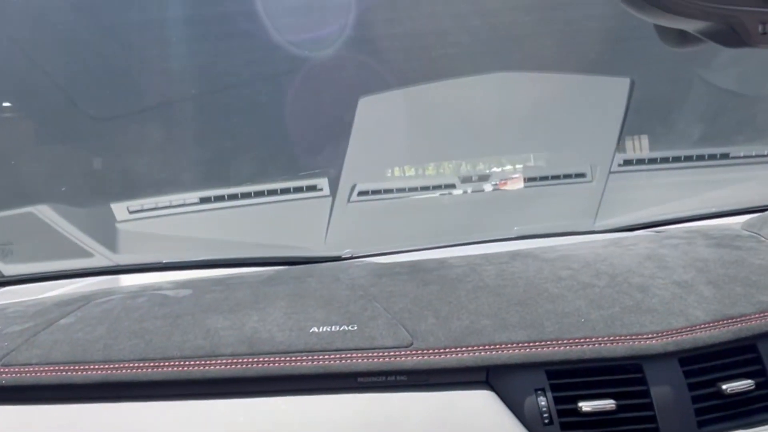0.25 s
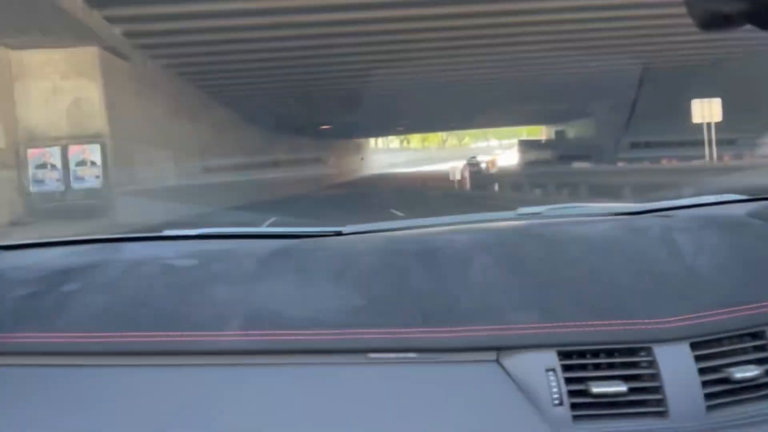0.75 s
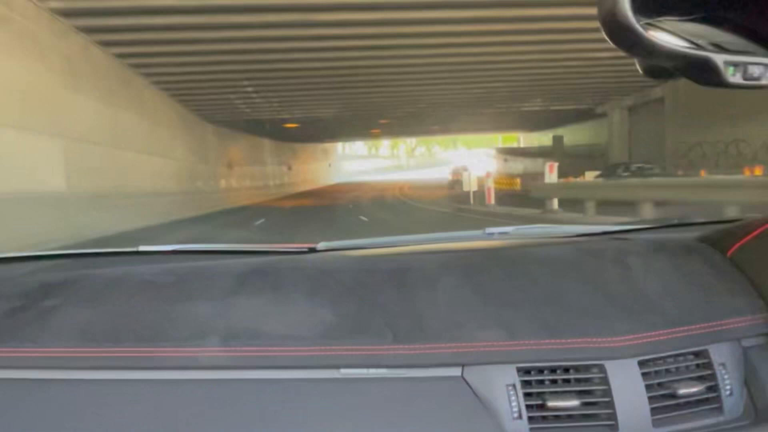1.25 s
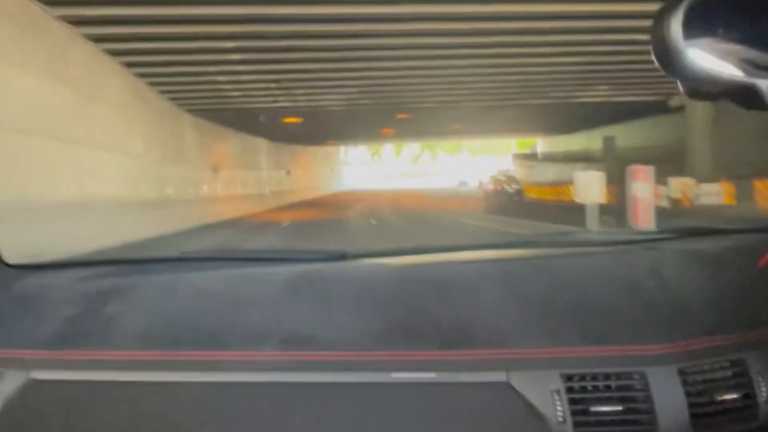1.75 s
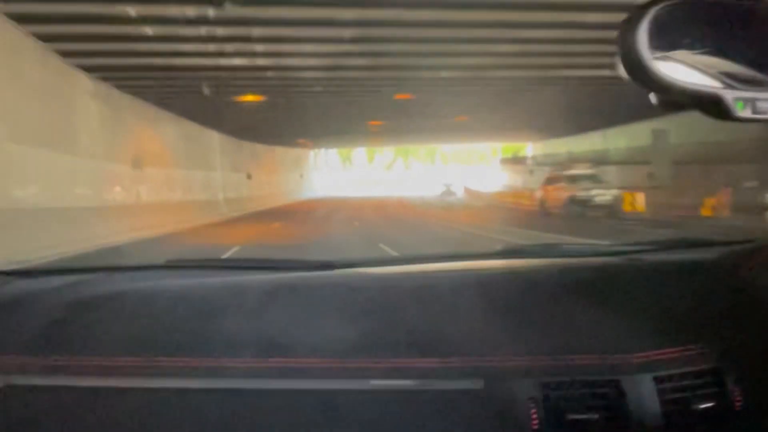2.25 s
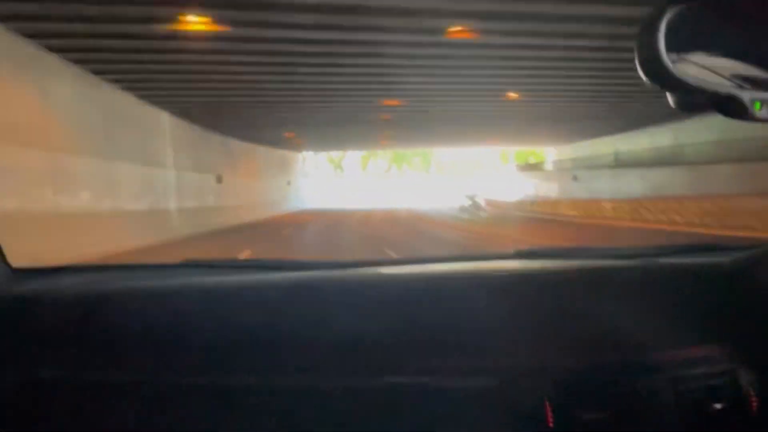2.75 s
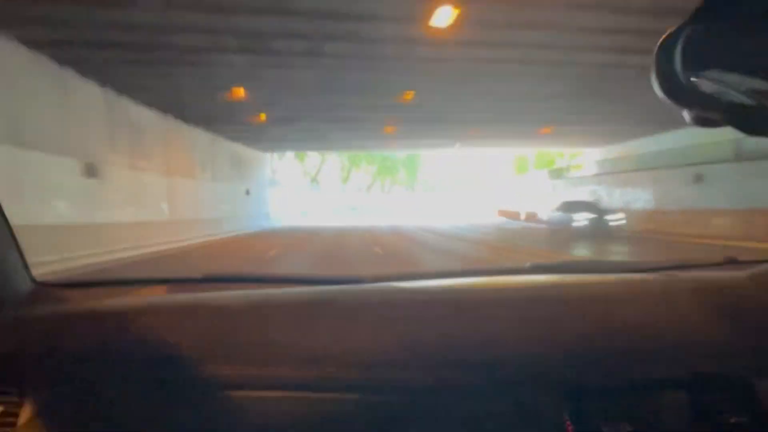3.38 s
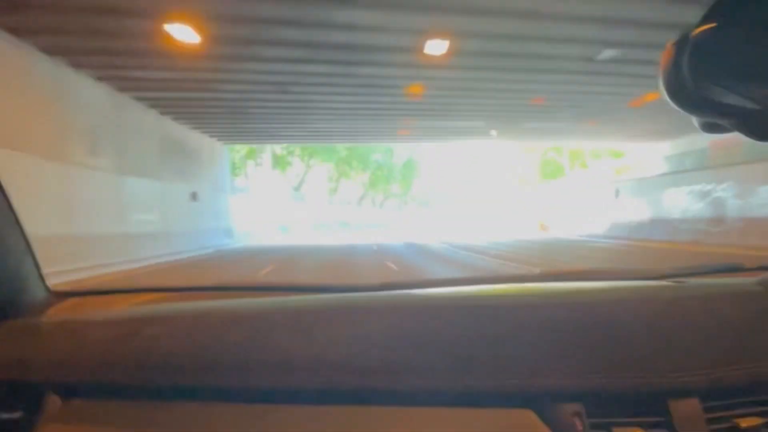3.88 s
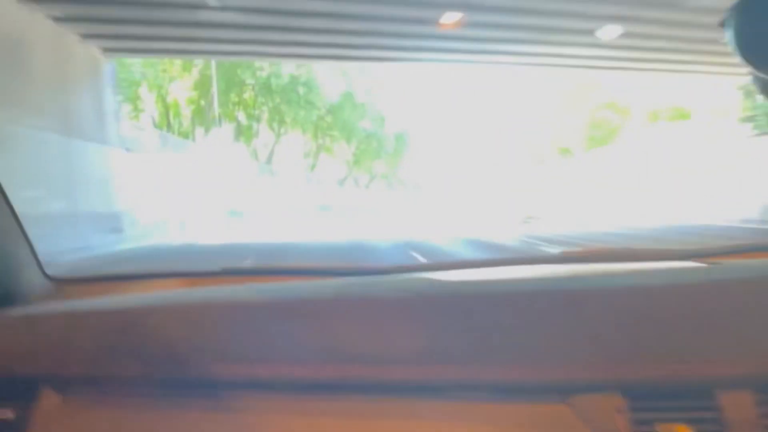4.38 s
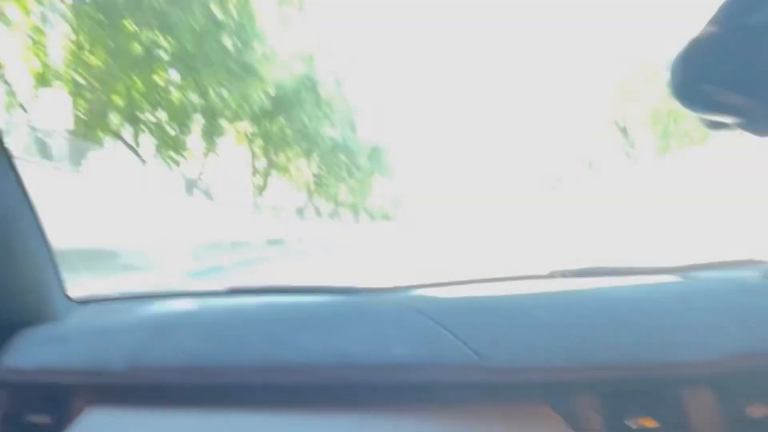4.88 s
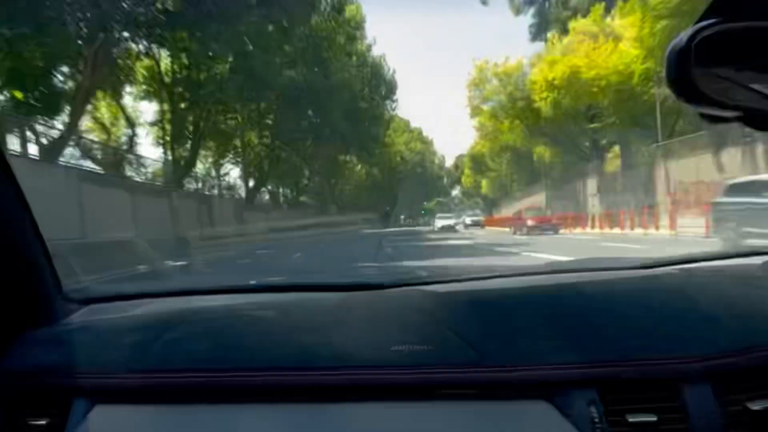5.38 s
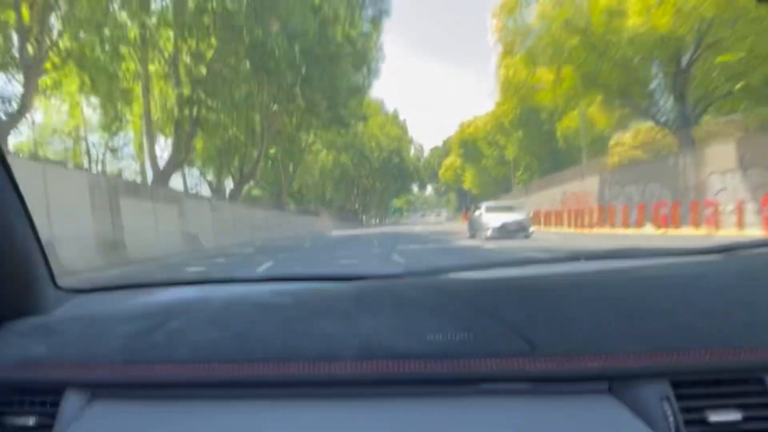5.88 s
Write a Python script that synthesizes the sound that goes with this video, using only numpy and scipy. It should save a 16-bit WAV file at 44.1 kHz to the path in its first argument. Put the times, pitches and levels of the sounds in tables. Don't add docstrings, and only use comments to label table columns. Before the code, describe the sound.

A phone inside a sports car cabin hears a low, steady twelve-cylinder growl with road rumble, body drone and wind hiss for the first 0.6 seconds. At about 0.7 a downshift lands as a heavy low thump with duller cracks and a brief, very high clutch squeak; the revs jump sharply by 0.9, and the cabin booms. A fainter squeak comes near 1.1. From 1 to 4.3 seconds the engine pulls hard, its note climbing from a throaty growl to a dense wail about twice as high, roughened by lower, beating echoes from the tunnel walls and gassy roar, with small bumps. Around 4.4 an upshift briefly cuts the power and drops the pitch; the note then holds almost level. At about 5.4 the driver lifts off: soft low thuds, the firing note collapses, and a quieter, wavering hum remains over rumble and hiss until 6.1.

```python
import sys
import numpy as np
from scipy import signal
from scipy.fft import rfft, irfft, next_fast_len
from scipy.io import wavfile
from scipy.ndimage import uniform_filter1d, map_coordinates

SR = 44100
rng = np.random.default_rng(int(sys.argv[2]) if len(sys.argv) > 2 else 0)


def persist_wave(psi):
    counts = np.round(np.clip(psi, -1, 1) * 32767).astype(np.int16)
    wavfile.write(sys.argv[1], SR, np.atleast_2d(counts).T)


def voltage_ratio(decibels):
    exponent = np.asarray(decibels, float) / 20
    return 10 ** exponent


N = 270200
T = np.arange(N) / SR

# time_s, crankshaft_turns_hz
REVS = [(0, 35.12), (.62, 34.83), (.9, 58.17), (1.0, 59.8), (1.3, 63.92), (1.5, 65.57), (1.9, 77.19),
        (2.2, 83.23), (2.35, 89.2), (2.9, 105), (3.4, 116.9), (3.6, 121.1), (4.05, 132.8), (4.37, 133.8),
        (4.58, 104.1), (5.2, 106.4), (5.42, 103.2), (6.13, 100.8)]


def unit(x):
    return x / np.sqrt(np.mean(np.abs(x) ** 2) + 1e-20)


def along(points, hz):
    f, v = np.transpose(points)
    return np.interp(np.log(hz + 1), np.log(f + 1), v)


def curves(rows, t=T):
    s, *cols = np.transpose(rows)
    return [np.interp(t, s, c) for c in cols]


def wobble(rate, t=T):
    return map_coordinates(rng.standard_normal(800), [t * rate])


def filtered(x, response):
    m = next_fast_len(N + SR // 2)
    return irfft(rfft(x, m) * response(np.fft.rfftfreq(m, 1 / SR)), m)[..., :N]


def rush(spectrum, patchy_db, size=10):
    z = signal.stft(rng.standard_normal((2, N)), nperseg=512)[2]
    field = uniform_filter1d(rng.standard_normal(z.shape[1:]), size=6, axis=0)
    field = uniform_filter1d(field, size=size, axis=1)
    pair = signal.istft(z * voltage_ratio(patchy_db * unit(field)), nperseg=512)[1][:, :N]
    return unit(filtered(pair, lambda hz: voltage_ratio(along(spectrum, hz))))


def peaks(rows, hz, floor_db):
    power = sum(voltage_ratio(db) ** 2 / (1 + ((hz - c) / w) ** 6) for c, w, db in rows)
    return np.sqrt(voltage_ratio(floor_db) ** 2 + power)


def turns():
    return 2 * np.pi * np.cumsum(uniform_filter1d(curves(REVS)[0], size=3000)) / SR


def firing_db(k):
    # time_s, firing_note_db, upper_orders_lean_db_per_octave
    firing = [(0, -17.5, -2.5), (.3, -5.5, -4.5), (.62, -3, -0.5), (.9, 0, -3), (1.2, -1.5, 2.5),
              (1.5, 1, 0.5), (1.78, 2.5, -4), (2.0, 1.5, 3), (2.4, 2, -1), (2.9, 1, -1), (3.1, -1.5, -1),
              (3.5, -3.5, -2.5), (3.9, -9, 2), (4.25, -6.5, -0.5), (4.65, -10, 0.5), (4.95, -6, -0.5),
              (5.15, -6, -8.5), (6.13, -4.5, -11)]
    level_db, lean = curves(firing)
    return level_db + lean * np.log2(k / 4)


def shut_db(t):
    # start_s, length_s, drop_db
    lifts = [
        (4.415, .18, -13),
        (5.366, .9, -22.5),
    ]
    fade_s = 0.079
    return sum(db * np.clip(np.minimum(t - s, s + length - t) / fade_s + .5, 0, 1)
               for s, length, db in lifts)


def boom(angle):
    # order_that_shakes_it, pitch_hz, half_width_hz, level_db
    mounts = [(1, 59.8, 3.3, -12), (1, 61, 4.5, -26), (1, 97.4, 2.1, -29.5), (1, 114, 10.7, -32.5),
              (1, 128, 3.4, -19.5), (1.5, 52.5, 2.9, -22), (1.5, 105.4, 4.7, -27), (1.5, 119, 4.6, -33),
              (1.5, 138, 3, -30.5), (1.5, 192, 16, -32.5), (2, 72, 5, -33), (2, 87, 9.6, -15.5),
              (2, 120, 2.5, -30), (2, 146.3, 10.4, -29)]
    mount_floor_db = {1: -51.5, 1.5: -54, 2: -64}
    hz = np.gradient(angle) * SR / (2 * np.pi)
    lead_s, cut = 0.13, 1.4
    effort_db = 0.96 * firing_db(4) + cut * shut_db(T + lead_s)
    tones = np.zeros(N)
    for k, floor_db in mount_floor_db.items():
        panels = [row[1:] for row in mounts if row[0] == k]
        gain = peaks(panels, k * hz, floor_db) * voltage_ratio(effort_db + 1.5 * wobble(8))
        tones += gain * np.sin(k * angle)
    return np.array([np.sqrt(2) * tones, np.zeros(N)])


def order_in_tunnel(k, angle, wetter, count=6):
    # time_s, largest_echo_pitch_drop (0-1), echo_share_of_note (0-1, cut off just under 1)
    walls = [(0, .03, .15), (.62, .04, .2), (.75, .07, .6), (1, .08, .65), (1.6, .09, .55), (2, .1, .7),
             (2.7, .11, .7), (3, .11, .6), (4.2, .12, .65), (4.4, .13, .95), (4.65, .1, .8),
             (4.8, .09, .55), (5, .1, .45), (5.1, .12, .15), (5.36, .12, .12), (5.45, .12, .6),
             (5.6, .2, 1.4), (6.13, .2, 1.4)]
    t = T[::16]
    drop, wet = curves(walls, t)
    wet = np.clip(wet * wetter, 0, .97)
    slip = np.cumsum(drop * np.gradient(angle[::16]))
    pair = []
    for direct in (1, 0):
        behind = .2 + .8 * (np.arange(count) + rng.random(count)) / count
        depth = np.append(behind, -.22)
        echoes = 0
        for d in depth:
            fading = (wobble(12, t) + 1j * wobble(12, t)) * voltage_ratio(-4 * abs(d) - 3 * (d < 0))
            echoes = echoes + fading * np.exp(-1j * k * d * slip)
        straight = direct * np.sqrt(1 - wet) * voltage_ratio(0.47 * wobble(14, t))
        shape = straight + np.sqrt(wet) * unit(echoes)
        in_step = np.interp(T, t, shape.real) * np.cos(k * angle)
        pair.append(in_step - np.interp(T, t, shape.imag) * np.sin(k * angle))
    return np.sqrt(2) * np.array(pair)


def exhaust(angle):
    main_db = {3: -19.5, 4.5: -26.5, 6: -18, 9: -27}
    # pitch_hz, half_width_hz, level_db
    cabin = [(198.5, 9, 6), (238.5, 7.6, 4.5), (268, 11.2, 2), (315, 21, -0.5), (345, 5.6, 3),
             (378.4, 22.6, 5), (464, 36, -2.5), (548, 30, -1), (643, 40, 3), (738, 23, 0.5), (830, 33, 4.5),
             (879, 53, 1.5), (1079, 115, 4.5), (1296, 38, 4)]
    # turns_hz, level_db
    uneven = [(35, -2.5), (58, 5.5), (65, -9), (72, -1.5), (82, -0.5), (92, 2.5), (104, -7), (120, -4),
              (135, -2)]
    # order, level_db relative to order 4.5
    weak = [(4, -9), (5, -6), (5.5, -1), (7, -11)]
    # order, level_db relative to order 9
    high = [(7.5, -2), (8, -9.5), (10.5, -11.5), (12, -9), (13.5, -16), (15, -19.5), (18, -23), (21, -25)]
    hz = np.gradient(angle) * SR / (2 * np.pi)
    third, half, sixth, ninth = [voltage_ratio(db + firing_db(k) + shut_db(T)) * peaks(cabin, k * hz, -7.5)
                                 for k, db in main_db.items()]
    half = half * voltage_ratio(along(uneven, hz))
    note = third * order_in_tunnel(3, angle, wetter=.65)
    note += half * order_in_tunnel(4.5, angle, wetter=1.3)
    note += sixth * order_in_tunnel(6, angle, wetter=.95)
    note += ninth * order_in_tunnel(9, angle, wetter=.9)
    for k, db in weak:
        note += half * voltage_ratio(db) * order_in_tunnel(k, angle, wetter=1.5)
    for k, db in high:
        note += ninth * voltage_ratio(db) * order_in_tunnel(k, angle, wetter=1)
    return note


def hollowed(x):
    order, half_width_octaves, depth_db = 1.78, 0.21, -8.5
    hz, t, z = signal.stft(x, SR, nperseg=2048)
    octaves = np.log2((hz[:, None] + 1) / (order * curves(REVS, t)[0]))
    dip = voltage_ratio(depth_db * np.exp(-(octaves / half_width_octaves) ** 2))
    return signal.istft(z * dip, SR, nperseg=2048)[1][:, :N]


def roar(angle):
    # time_s, engine_effort_db, body_shaking_db
    drive = [(0, -5, 6.5), (.15, -6, 1.5), (.6, -5, 8), (.8, -2, 13), (1.2, -1.5, 14), (1.35, -1.5, 5),
             (1.8, 0, 7.5), (2.05, 2, 0.5), (2.2, -0.5, 1.5), (2.92, 0, 6), (3.0, -3.5, -4), (3.4, -3, -1),
             (4.25, -2.5, -3), (4.6, -12, 1.5), (4.9, -9, -0.5), (5.33, -9.5, 3), (5.5, -15.5, 1),
             (6.13, -14, 1.5)]
    # time_s, surge_db
    shunts = [(.72, 5.5), (.87, 12), (1.0, 6), (1.26, 8.5), (1.45, 7), (1.69, -1.5), (2.0, 7.5), (2.6, 1.5),
              (4.45, 7), (5.03, 4), (5.22, 4), (5.42, 6), (5.5, 1)]
    # level_db, share of effort, of shaking and of surges that each layer follows
    layers = [
        (-25, .05, 1, 0.65),
        (-13, 1, 0.32, 0.38),
        (-25, 1, 0.016, 0.13),
        (-42, 0.96, 0.19, 0.35),
    ]
    # pitch_hz, level_db_per_hz
    road_colour = [(11, -63), (18, -32), (35, -10), (59, 5.5), (132, -5.5), (149, -7.5), (209, -5.5),
                   (358, -7.5), (450, -38), (580, -69), (990, -120)]
    body_colour = [(60, -15), (110, -3.5), (170, -3), (250, -2.5), (400, 2), (600, -2.5), (900, -0.5),
                   (1800, -50)]
    gas_colour = [(300, -17.5), (600, -3), (1000, -1.5), (1400, -8.5), (1900, -14.5), (2700, -14.5),
                  (3400, -24), (4200, -30.5), (6000, -56.5)]
    hiss_colour = [(2500, -30), (3600, -4), (4400, -3), (5200, 0), (6500, -2), (7500, -3), (10500, -2),
                   (11200, -6), (11800, -10), (12400, -17), (13000, -24), (13400, -60)]
    effort_db, shake_db = curves(drive)
    surge_half_s = 0.054
    surge_db = sum(db * np.exp(-((T - s) / surge_half_s) ** 2) for s, db in shunts)
    road_db, body_db, gas_db, hiss_db = [db + a * effort_db + b * shake_db + c * surge_db
                                         for db, a, b, c in layers]
    road = voltage_ratio(road_db - 7 + 2.4 * wobble(9)) * rush(road_colour, patchy_db=0.5)
    body = hollowed(voltage_ratio(body_db - 10.5) * rush(body_colour, patchy_db=4.0))
    puff = 1 + .22 * np.cos(3 * angle)
    gas = voltage_ratio(gas_db + 1.0) * puff * rush(gas_colour, patchy_db=1.0)
    open_air_db, portal_s = 2, .68
    hiss_db = hiss_db + open_air_db * np.clip((portal_s - T) / .1, 0, 1)
    flutter_db = .9 * wobble(36)
    hiss = voltage_ratio(hiss_db + flutter_db) * rush(hiss_colour, patchy_db=2.0, size=5)
    trim = filtered(hiss, lambda hz: hz > 9900)
    trim_gain = voltage_ratio(-4 + 0.32 * shake_db)
    return road + body + gas + hiss + (trim_gain - 1) * trim


def thuds():
    # start_s, peak_db, ring_hz, 60_db_fade_s, crack_db
    jolts = [(.688, 3, 86.8, 0.36, -19), (0.794, -5, 73.6, 0.26, -16), (0.864, -12, 61.5, .2, -2),
             (1.689, -34, 89.95, .1, -17), (1.885, -17, 72.56, 0.11, -21), (2.512, -27, 90.5, 0.089, -27),
             (4.271, -19, 58, 0.54, -42), (4.44, -26, 95, .15, -32), (4.915, -30, 58.06, 0.2, -31),
             (5.2, -15, 90, .15, -37), (5.401, -19, 65.4, 0.36, -38), (5.449, -23, 118, .3, -36),
             (5.49, -19, 75, .25, -43), (5.546, -12.5, 58.64, 0.23, -47), (5.834, -27, 54, .25, -45),
             (6.009, -20, 61.94, .2, -45)]
    # start_s, length_s, from_hz, to_hz, level_db
    squeaks = [
        (.69, .055, 11900, 10500, -38),
        (.685, .035, 9000, 8300, -43),
        (1.135, .065, 11300, 10600, -41),
    ]
    out = np.zeros((2, N + SR))
    t = T[:SR // 2]
    dull = signal.butter(4, 1050, fs=SR, output="sos")
    for s, db, hz, fade_s, crack_db in jolts:
        i = round(s * SR)
        ring = voltage_ratio(db - 60 * t / fade_s) * (1 - np.exp(-t / 0.0095))
        out[0, i:i + len(t)] += ring * np.sin(2 * np.pi * hz * t)
        crack = voltage_ratio(crack_db + 9 - 60 * t / .08) * (1 - np.exp(-t / .002))
        crack = crack * rng.standard_normal((2, len(t)))
        out[:, i:i + len(t)] += signal.sosfilt(dull, crack)
    for s, length, from_hz, to_hz, db in squeaks:
        i = round(s * SR)
        u = np.clip(t / length, 0, 1)
        pitch_hz = from_hz + (to_hz - from_hz) * u + 250 * wobble(1200, t)
        tone = np.sin(2 * np.pi * np.cumsum(pitch_hz) / SR)
        out[0, i:i + len(t)] += voltage_ratio(db) * np.sin(np.pi * u) * tone
    return out[:, :N]


def scene():
    # pitch_hz, left_right_likeness (0-1)
    alike = [(60, .82), (340, .86), (700, .8), (1200, .4), (1900, .72), (3400, .4), (4500, .1), (6000, .3),
             (8100, .74), (9650, .85), (10500, .75), (11800, .8)]
    # pitch_hz, left_leads_radians
    lead = [(40, .2), (340, .7), (700, 1.7), (1100, 1.5), (1400, .5), (1900, .5), (2900, 3.3), (4000, .8),
            (5200, -.4), (6500, .7), (8000, 2.6), (9650, 3), (10500, 3.9), (11800, 6)]
    # pitch_hz, left_minus_right_db
    tilt = [(60, -8.5), (110, -2.5), (200, -4), (360, -4), (650, 1), (1170, 3.5), (2120, 2.5), (3840, -1.5),
            (6960, -1), (12600, -0.5)]
    angle = turns()
    common, apart = boom(angle) + exhaust(angle) + roar(angle) + thuds()

    def like(hz):
        return np.clip(along(alike, hz), 0, 1)

    left = filtered(common, lambda hz: voltage_ratio(along(tilt, hz) / 2))
    right = filtered(common, lambda hz: like(hz) * np.exp(-1j * along(lead, hz)))
    right += filtered(apart, lambda hz: np.sqrt(1 - like(hz) ** 2))
    return np.array([left, filtered(right, lambda hz: voltage_ratio(-along(tilt, hz) / 2))])


def thinned(x):
    # typical_edge_hz, jump_hz
    edge_rows = [
        (9500, 450),
        (10200, 60),
        (12150, 330),
        (11450, 230),
    ]
    hz, t, z = signal.stft(np.array([x[0] + x[1], x[0] - x[1]]) / 2, SR, nperseg=1024)
    hz = hz[:, None]
    jumps = rng.standard_normal((len(t) // 4 + 1, 4))[np.arange(len(t)) // 4]
    start, end, top, side_top = [edge + jump * j - hz for (edge, jump), j in zip(edge_rows, jumps.T)]
    sink = 110 * t
    start, top = start - sink, top - sink / 3
    below_gap = (start > 0) & (hz < 9700)
    z[0] *= (below_gap | (end < 0)) & (top > 0)
    z[1] *= side_top > 0
    faint = np.abs(z) < .75 * uniform_filter1d(np.abs(z), size=15, axis=1)
    z *= ~(faint & (hz > 1200))
    mid, side = signal.istft(z, SR, nperseg=1024)[1][:, :N]
    return np.array([mid + side, mid - side])


def roll_off(x):
    return signal.sosfilt(signal.butter(12, 13200, fs=SR, output="sos"), x)


def record(dry):
    limited = dry / (1 + np.abs(dry / .93) ** 5) ** (1 / 5)
    return roll_off(thinned(limited))


dry = scene()
out = record(dry)
persist_wave(out)
```